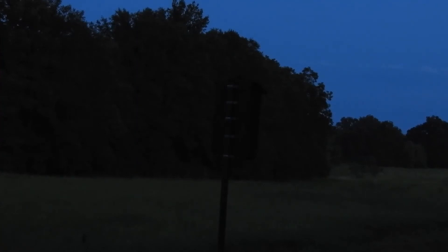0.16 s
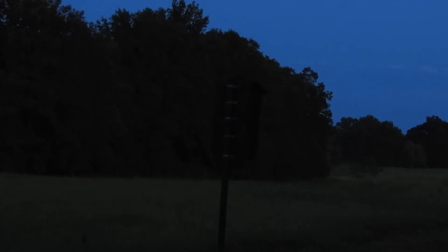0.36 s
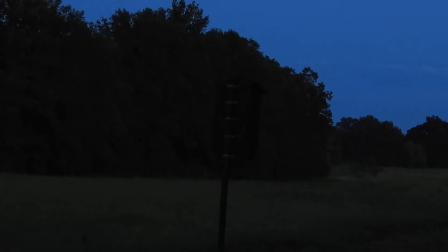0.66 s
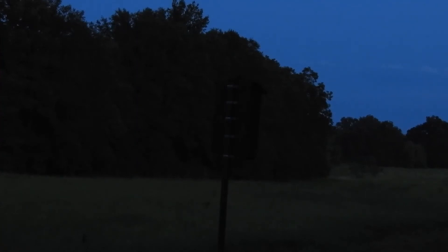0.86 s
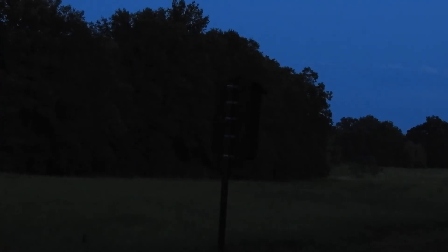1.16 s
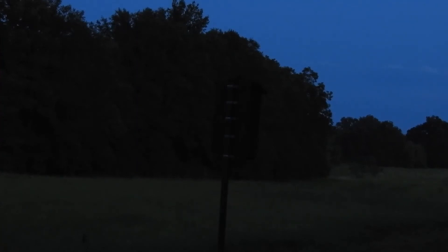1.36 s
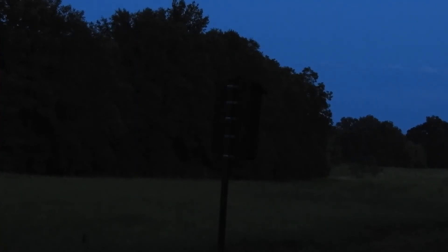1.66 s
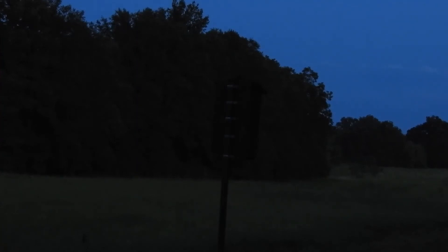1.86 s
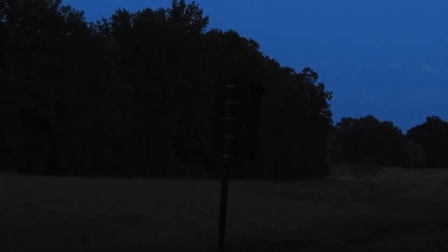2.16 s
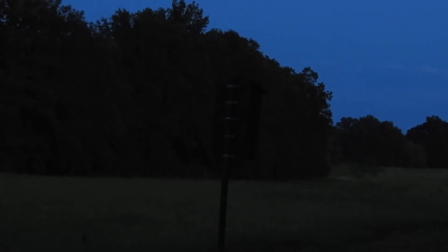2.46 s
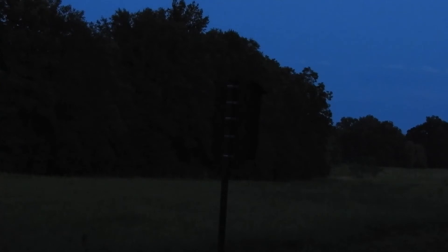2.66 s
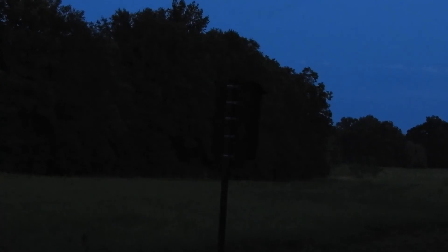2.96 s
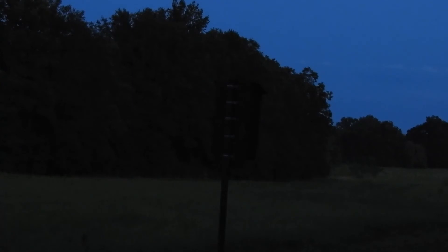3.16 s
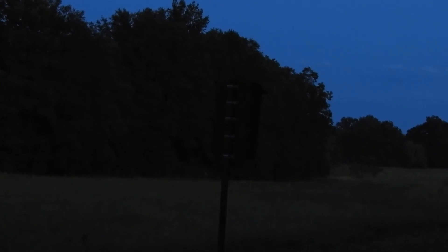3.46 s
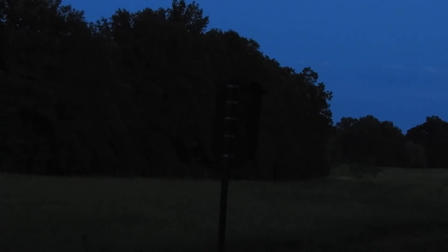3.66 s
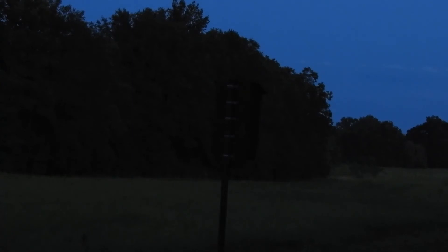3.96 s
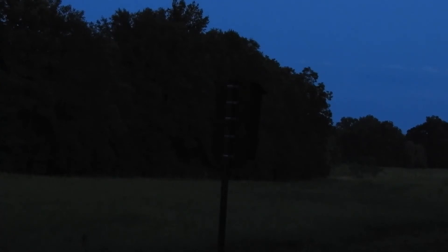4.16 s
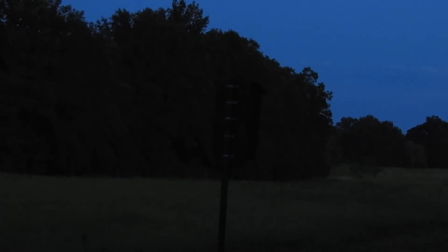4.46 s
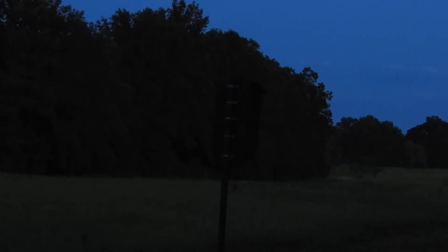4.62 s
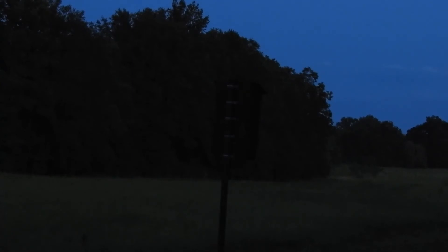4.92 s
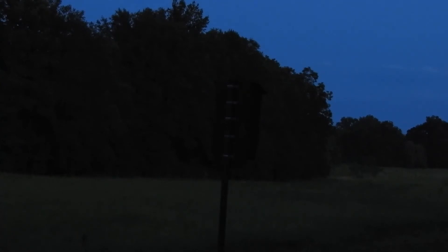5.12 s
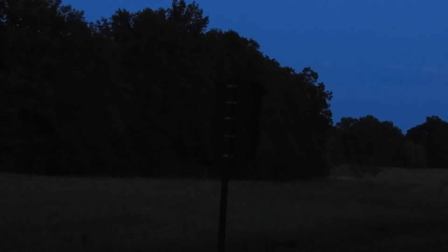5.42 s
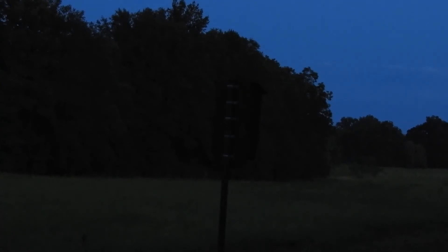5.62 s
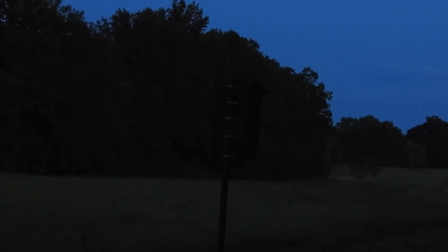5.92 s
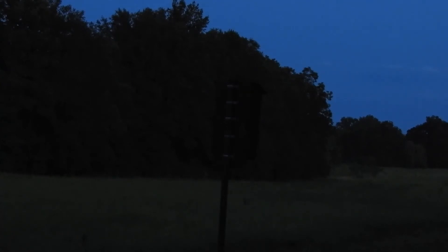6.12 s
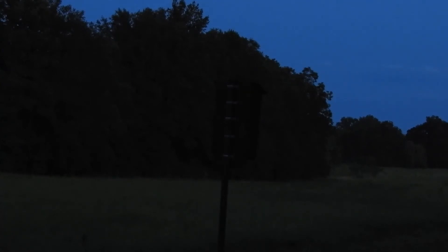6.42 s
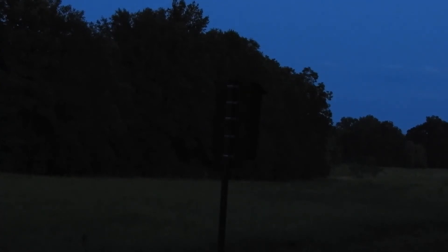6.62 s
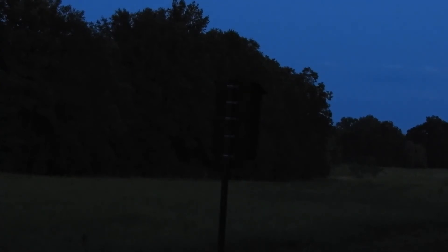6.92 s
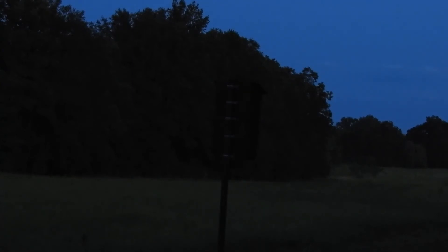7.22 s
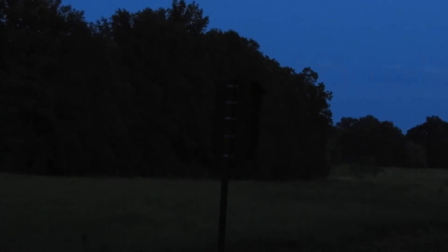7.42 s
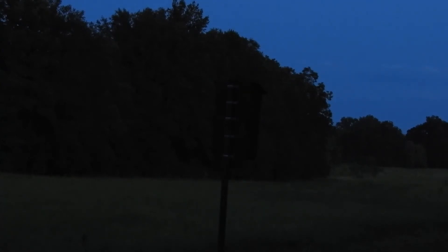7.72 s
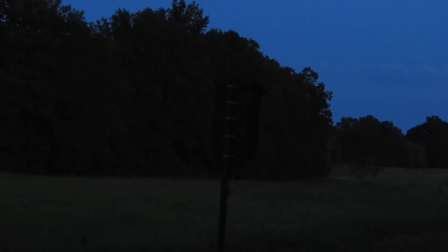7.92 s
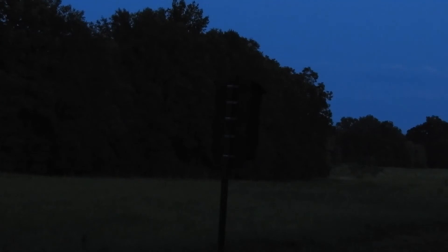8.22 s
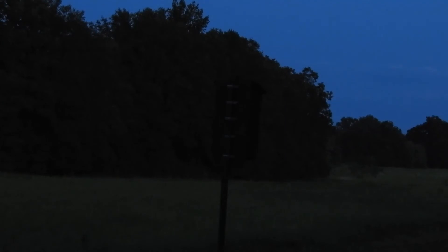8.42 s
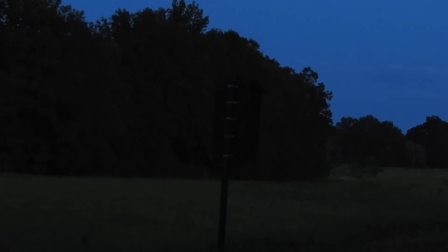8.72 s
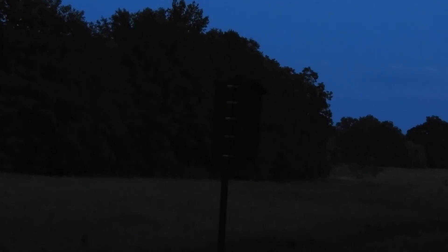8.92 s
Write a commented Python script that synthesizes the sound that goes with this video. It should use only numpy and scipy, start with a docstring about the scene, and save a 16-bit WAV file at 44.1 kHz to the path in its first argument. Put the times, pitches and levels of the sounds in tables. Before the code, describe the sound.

Dense high insect buzzing over a dusk field, a far cicada throbbing and sharp bird chips, then a near cicada swells into a loud harsh buzz.

```python
"""An open field at dusk with a tree line behind it, heard by two close microphone ports for nine seconds.
From the start choirs buzz as resonant bands of noise, some pulsing, over low noise and a faint hiss; a cicada of
even clicks gives short tonal notes and a far one throbs as swelling rasps, both until after 5 s. A bird's upward
chips, at 0.8, 3, 6 and 8 s, are echoed by the trees. From 4.6 s a near cicada swells up, its clicks ringing body
resonances; from 5.6 to 7.9 s brief breaks interrupt its buzz."""
import sys
import numpy as np
from scipy import signal
from scipy.fft import rfft, irfft
from scipy.io import wavfile
from scipy.ndimage import uniform_filter1d

SR = 44100
rng = np.random.default_rng(int(sys.argv[2]) if len(sys.argv) > 2 else 0)


def rack_gain(trim_db):
    """Turn a fader trim in dB into the linear factor to multiply a signal by."""
    fader = np.asarray(trim_db, float)
    return 10 ** (fader / 20)


def bounce(signal):
    """Save signal as a 16-bit WAV file at the path given by the first command-line argument."""
    frames = np.transpose(np.atleast_2d(signal))
    limited = np.clip(frames, -1, 1)
    pcm = np.round(limited * 32767).astype(np.int16)
    wavfile.write(sys.argv[1], SR, pcm)


N = 400428
T, HZ = np.arange(N) / SR, np.fft.rfftfreq(N, 1 / SR)


def level(x, db):
    """Root-mean-square normalisation: scale to an rms level in dB."""
    return x * rack_gain(db) / np.sqrt(np.mean(x ** 2))


def curve(table):
    """Linear interpolation in time: each column of a table becomes one value a sample."""
    s, *columns = np.transpose(table)
    return [np.interp(T, s, column) for column in columns]


def gate(start, end, rise, fall):
    """Raised-cosine envelope, 0-1: smooth rise after the start, smooth fall after the end."""
    ramp = np.minimum((T - start) / rise, 1 - (T - end) / fall)
    return np.sin(np.pi / 2 * np.clip(ramp, 0, 1)) ** 2


def walk(rate):
    """Low-pass random fluctuation: slow chance with spread 1, drawn at a rate in Hz."""
    hold = int(SR / rate)
    steps = np.repeat(rng.standard_normal(N // hold + 1), hold)
    smooth = uniform_filter1d(uniform_filter1d(steps, hold), hold)[:N]
    return smooth / smooth.std()


def shape(x, points):
    """Zero-phase filtering: gain in dB interpolated between (frequency, gain) points on a log axis."""
    hz, db = np.transpose(points)
    gain = rack_gain(np.interp(np.log(HZ + 1), np.log(hz), db))
    return irfft(rfft(x) * gain, N)


def ring(x, modes):
    """Modal superposition: resonances side by side, each applied twice for steep skirts."""
    gain = 0
    for k, (hz, width, db) in enumerate(modes):
        sign = (-1) ** k  # neighbours in opposite phase
        gain = gain + sign * rack_gain(db) / (1 + 1j * (HZ - hz) / width) ** 2
    return irfft(rfft(x) * gain, N)


def place(x, lag_us, pan_db, echo_db=-200, t60=1):
    """Interaural-style cues: direct sound lags between ports; the trees scatter a different tail to each."""
    t = T[:int(SR / 2)]
    decay = np.exp(-np.log(1000) * t / t60) * (t > 1 / 500)
    tail = rng.standard_normal((2, len(t))) * decay
    tail *= rack_gain(echo_db) / np.sqrt(np.sum(tail ** 2, axis=1, keepdims=True))
    side = np.array([[.5], [-.5]])
    direct = rack_gain(pan_db * side) * np.exp(-2j * np.pi * HZ * side * lag_us / 10 ** 6)
    ports = irfft(rfft(x) * (direct + rfft(tail, N)), N)
    return ports / np.sqrt(1 + rack_gain(2 * echo_db))  # echo adds no power overall


# Near cicada's effort: (time [s], level of the drive [dB])
NEAR_EFFORT = [(4.6, -64), (5.3, -60), (5.9, -54), (6.15, -51.5), (6.4, -47.5), (6.8, -46.5), (8.1, -47),
               (9.08, -47)]
# Its click rate: (time [s], rate [Hz])
NEAR_CLICK_RATE = [(4.6, 206.5), (6.2, 209.6), (7.0, 216.9), (8.0, 216.5), (9.08, 212.1)]
# Lower body resonances: (centre [Hz], half-width [Hz], relative level [dB])
NEAR_LOWER_BODY = [(2610, 220, -26), (2725, 32, -10), (2934, 120, -11), (3380, 164, -7), (3476, 43, -1),
                   (3630, 94, -5), (3748, 126, -3.5)]
# Upper body resonances: (centre [Hz], half-width [Hz], relative level [dB])
NEAR_UPPER_BODY = [(4170, 355, -2.5), (4665, 210, 1), (4790, 150, 3), (5000, 31, -0.5), (5240, 370, -12),
                   (6250, 90, -4)]
# Slacker body, ringing while it warms up: (centre [Hz], half-width [Hz], relative level [dB])
NEAR_SLACK_BODY = [(2240, 57, -14.5), (4420, 350, -3.5)]
# Breaks in its buzz: (middle [s])
BUZZ_BREAKS = [5.565, 5.742, 5.931, 6.116, 6.293, 6.467, 6.638, 6.81, 6.99, 7.182, 7.367, 7.565, 7.747,
               7.929]


def near_cicada():
    """Impulse-excited resonance: two drums buckle in turn; clicks and short rasps ring the body modes."""
    jitter_us, scatter_db, alternate = 60, 1, .15  # irregular timing and strength; drum inequality 0-1
    rasp, upper_late_s = .42, .0016
    break_depth, break_full_s, break_fade_per_s, break_s = .95, 7.0, .6, .006
    phase = np.cumsum(curve(NEAR_CLICK_RATE)[0]) / SR
    beats = np.arange(1, int(phase[-1]))
    chance = rng.standard_normal((len(beats), 2))
    at = np.interp(beats, phase, T) + jitter_us / 10 ** 6 * chance[:, 0]
    size = rack_gain(scatter_db * chance[:, 1]) * (1 + alternate * (-1.) ** beats)
    clicks = np.bincount(np.clip(at * SR, 0, N - 1).astype(int), size, N)
    rasp_envelope = level(uniform_filter1d(clicks, size=110), 0)
    drive = level(clicks, 0) + rasp * rng.standard_normal(N) * rasp_envelope
    for s in BUZZ_BREAKS:
        # Later breaks are shallower
        depth = break_depth - break_fade_per_s * max(s - break_full_s, 0)
        drive = drive * (1 - np.clip(depth, 0, 1) * np.exp(-((T - s) / break_s) ** 4))
    # The body tightens: upper modes gain, slack modes fade
    tighten_s = (5.8, 6.62)
    upper_db = np.interp(T, tighten_s, (-8.5, 0.1))
    slack_db = np.interp(T, tighten_s, (-1.5, -13))
    upper = np.roll(ring(drive, NEAR_UPPER_BODY), int(upper_late_s * SR))
    body = level(ring(drive, NEAR_LOWER_BODY), 0)
    body += rack_gain(upper_db) * level(upper, 0)
    body += rack_gain(slack_db) * level(ring(drive, NEAR_SLACK_BODY), 0)
    fade_in = np.clip((T - NEAR_EFFORT[0][0]) * 2, 0, 1)
    return place(body * rack_gain(curve(NEAR_EFFORT)[0]) * fade_in, -17, 1.8, -9, .09)


# Chips: (start [s], gain [dB])
BIRD_CHIPS = [(0.7627, -28), (3.03, -28), (6.042, -28.5), (8.081, -27.5)]


def bird():
    """Frequency glide: a quick upward chip, hoarse, with a faint octave; the tree line draws it out."""
    start_hz, end_hz, chip_s, octave = 6050, 7650, .008, .006
    out, t = np.zeros(N), T[:int(chip_s * SR)]
    phase = 2 * np.pi * (start_hz * t + (end_hz - start_hz) * t * t / chip_s / 2)
    hoarse = 1 + .4 * np.cos(2 * np.pi * 450 * t)
    envelope = np.minimum(t / 0.00051, 1) * (1 - t / chip_s) ** 0.5
    chip = envelope * hoarse * (np.sin(phase) + octave * np.sin(2 * phase))
    for s, db in BIRD_CHIPS:
        out[int(s * SR):][:len(t)] += rack_gain(db) * chip
    return place(out, 13, -1.5, 6, 0.29)


# Short tonal notes: (start [s], length [s], level at nine times the click rate [dB], neighbours' level [dB])
TONAL_NOTES = [(0.083, 0.12, -57, -71), (0.167, .15, -60, -63.5), (0.825, .14, -54.5, -76),
               (0.999, 0.16, -65, -60.5), (1.551, 0.21, -58.5, -79), (1.861, 0.13, -54, -62),
               (2.334, 0.15, -56.5, -81), (2.469, .08, -62, -76), (2.694, .14, -57.5, -59),
               (3.181, 0.09, -57, -76), (3.529, 0.16, -56.5, -61), (4.358, 0.16, -59, -64),
               (5.201, 0.18, -57.5, -59.5)]
# Neighbours: (multiple of the click rate [1], level offset [dB], delay [s], share of the length [0-1])
NOTE_NEIGHBOURS = [(7, -6, .04, .9), (7.5, -7, 0, 1), (8, 1, .025, 1), (10, -1, 0, .6)]


def notes():
    """Harmonic line spectrum: clicks so even that single overtones stand out, each fluttering alone."""
    click_rate_hz = 417
    out, waver = np.zeros(N), 1 + 0.0016 * walk(25)
    flutters = [rack_gain(3 * walk(35)) for _ in range(5)]
    for s, length, db, other_db in TONAL_NOTES:
        i = slice(int(s * SR), int((s + length + .05) * SR))
        phase = 2 * np.pi * click_rate_hz * np.cumsum(waver[i]) / SR
        overtones = [(9, db, 0, 1.0)]
        overtones += [(k, other_db + d, late, share) for k, d, late, share in NOTE_NEIGHBOURS]
        for (k, gain_db, late, share), flutter in zip(overtones, flutters):
            progress = np.clip((T[i] - s - late) / (length * share), 0, 1)
            swell = np.sin(np.pi * progress).clip(0) ** .8
            tone = np.sqrt(2) * np.sin(k * phase + k * k)
            out[i] += rack_gain(gain_db) * swell * flutter[i] * tone
    return place(out, 8, -1.5, -10, .08)


# Body resonances: (centre [Hz], half-width [Hz], relative level [dB])
THROB_RESONANCES = [(5060, 30, 0), (5200, 35, 0), (5300, 30, -1), (5400, 800, -8), (5620, 30, -4),
                    (5815, 30, 1)]
# Throbs: (start [s], end [s], effort reached at the end [dB])
THROB_SWELLS = [(-.4, 0.197, -46), (.4, 1.04, -48), (1.204, 1.843, -48), (2.035, 2.718, -48.5),
                (2.85, 3.546, -50), (3.75, 4.42, -51.5), (4.654, 5.293, -55)]


def throbbing_cicada():
    """Amplitude-modulated resonance: a rasp in body modes swells about once in 0.8 s and stops short."""
    rise_s, fall_s, grow_db, drone_db = 0.13, 0.066, 1.5, -58.5
    rasp = rng.standard_normal(N) * rack_gain(0.76 * walk(12))
    rasp = level(ring(rasp, THROB_RESONANCES), -5.5)
    effort = rack_gain(drone_db)  # a faint drone stays between throbs
    for s, end, db in THROB_SWELLS:
        remaining = np.clip((end - T) / (end - s), 0, 1)
        effort = effort + gate(s, end, rise_s, fall_s) * rack_gain(db - grow_db * remaining)
    return place(rasp * effort, 28, -0.3, -2.7, 0.71)


# Far choirs: (centre [Hz], half-width [Hz], source level [dB], mean pulse rate [Hz],
# pulse depth of the nearest singers [0-1], left lag [us], scattered singers relative to nearest [dB])
FAR_CHOIRS = [(2670, 130, -79, 59, 0.8, 6, -3), (3135, 420, -62.5, 170, 0.1, 8.9, -1.5),
              (3516, 330, -58, 510, 0.1, 4.8, -2), (4470, 550, -57, 300, 0, 16, -0.5),
              (5135, 700, -53, 140, 0.3, 18, 5), (5820, 370, -57, 83, 0.6, 40, -3),
              (6560, 480, -55, 69, .2, 38, 2), (7120, 260, -50.5, 47, .6, 53.9, -6),
              (7490, 240, -54.5, 72, 1, 54.4, -4.5), (8030, 240, -64, 100, 0.1, 38.5, -1),
              (9750, 640, -83, 66, 0.7, 87, -7)]


def choirs():
    """Spatial coherence: bands of rasping noise, some pulsing, others nearly steady, partly alike at the ports."""
    out, swell = 0, walk(.7)
    for hz, width, db, rate_hz, depth, lag_us, spread_db in FAR_CHOIRS:
        beat = np.cos(2 * np.pi * np.cumsum(rate_hz * (1 + 0.01938 * walk(3))) / SR)
        nearest = rng.standard_normal(N) * (1 + np.clip(depth, 0, 1) * beat)
        alike = place(nearest, lag_us, -0.21)  # only the nearest singers reach both ports alike
        scattered = rack_gain(spread_db) * rng.standard_normal((2, N))
        rasp = (alike + scattered) * rack_gain(.5 * swell + .9 * walk(6))
        out = out + level(ring(rasp, [(hz, width, 0)]), db)
    return out


# Low noise colour: (frequency [Hz], relative spectral density [dB])
MURMUR_COLOUR = [(18, -37), (30, -20), (102, -10.5), (129, -8.5), (162, -1), (220, -4), (253, 0),
                 (287, -5.5), (424, -8.5), (749, -8.5), (819, -10), (895, -16), (1110, -17), (1670, -19),
                 (2100, -18.5), (2730, -43), (4620, -120)]
# Bands of the low noise: (low edge [Hz], high edge [Hz], usual gain [dB], changed gain [dB], wander [dB])
LOW_NOISE_BANDS = [(40, 125, -5, 4.5, 2), (216.4, 790, -0.5, -11, .5), (856, 1400, -1, -2, 0)]
# Level changes of the recorded low noise: its middle band drops while its bass band rises:
# (start [s], end [s], depth [0-1])
LOW_NOISE_BAND_CHANGES = [(2.66, 2.95, 0.43), (3.56, 3.8, 0.93), (4.85, 5.1, 0.66), (5.62, 5.74, 0.6),
                          (5.84, 9.3, 1)]
# Level rises of the top band of the recorded low noise: (start [s], end [s], rise [dB])
LOW_NOISE_TOP_RISES = [(0.682, .9, 5.5), (1.3, 2.4, 5.5), (3.3, 3.55, 2), (3.9, 4.75, 4.5), (5.2, 5.6, 1.5)]


def murmur():
    """Partial coherence: low noise with two faint hums, partly shared by the ports; band levels change."""
    edge_s = .08
    mid, side = (shape(rng.standard_normal(N), MURMUR_COLOUR) for _ in range(2))
    hum = ring(rng.standard_normal(N), [(248.8, 8.5, -2.5), (832.6, 19, -11)])
    shared = level(mid, 0) + level(hum * rack_gain(2.5 * walk(4)), -9.0)
    opposed = .68 * level(side, 0) * np.array([[1], [-1]])
    both = level(shared + opposed, -77.5) * rack_gain(.6 * walk(5))
    change = sum(depth * gate(s, end, edge_s, edge_s) for s, end, depth in LOW_NOISE_BAND_CHANGES)
    top_db = sum(db * gate(s, end, edge_s, edge_s) for s, end, db in LOW_NOISE_TOP_RISES)
    out, spectrum = both, rfft(both)
    for (lo_hz, hi_hz, usual_db, changed_db, wander_db), extra_db in zip(LOW_NOISE_BANDS, (0, 0, top_db)):
        band = irfft(spectrum * ((HZ > lo_hz) & (HZ < hi_hz)), N)
        gain_db = usual_db + (changed_db - usual_db) * change + wander_db * walk(2.98) + extra_db
        out = out + band * (rack_gain(gain_db) - 1)  # the band is already in the sum once
    return out


# Notch of the path over the grass to the far singers: (frequency [Hz], gain [dB])
GRASS_PATH = [(3850, -2.5), (3990, -5.5), (4130, 0)]
# The singers' sound falls away below about 2 kHz: (frequency [Hz], gain [dB])
SINGERS_LOW_CUT = [(1000, -20), (1700, -11.5), (2150, -9), (2450, -0.5)]


def scene():
    """Linear superposition: all singers, filtered by path and a low cut, over the murmur."""
    far = shape(choirs() + throbbing_cicada(), GRASS_PATH)
    singers = far + near_cicada() + notes() + bird()
    return shape(singers, SINGERS_LOW_CUT) + murmur()


def band_limit(x):
    """A steep low-pass at the top of the band."""
    return signal.sosfilt(signal.butter(12, 15140, fs=SR, output="sos"), x)


# Microphone response: (frequency [Hz], gain [dB])
MIC_RESPONSE = [(20, -0.5), (7600, 1), (8600, -3.5), (10500, -0.5), (20000, -7)]


def record(dry):
    """Transducer response and self-noise: the microphone's top falls; a faint hiss flickers over it."""
    hiss = level(ring(rng.standard_normal((2, N)), [(13500, 2800, 0)]), -91.5)
    mix = shape(dry, MIC_RESPONSE) + hiss * rack_gain(1.7 * walk(4.2))
    return band_limit(mix)


dry = scene()
out = record(dry)
bounce(out)
```